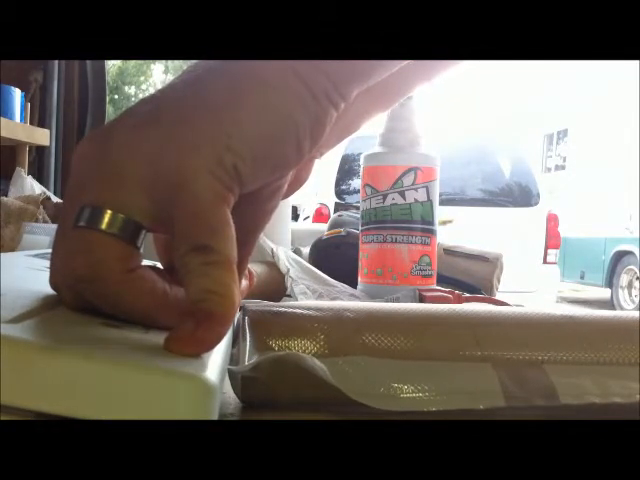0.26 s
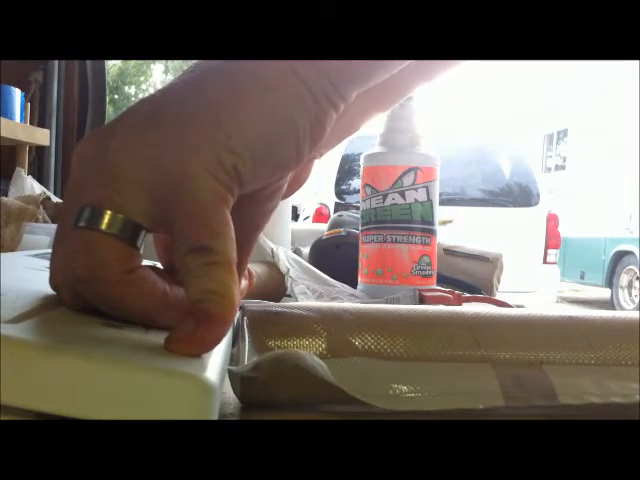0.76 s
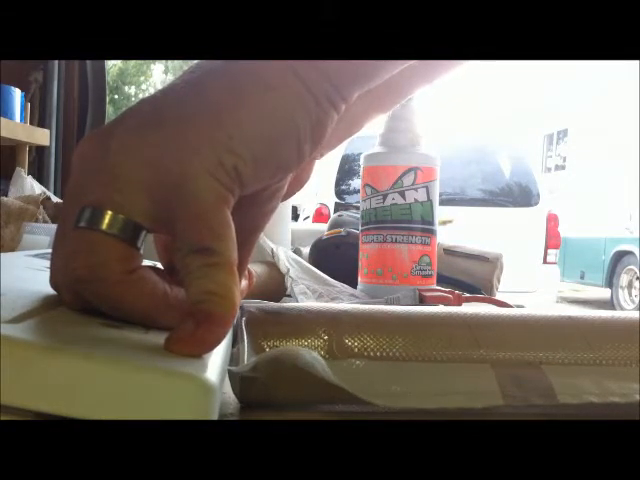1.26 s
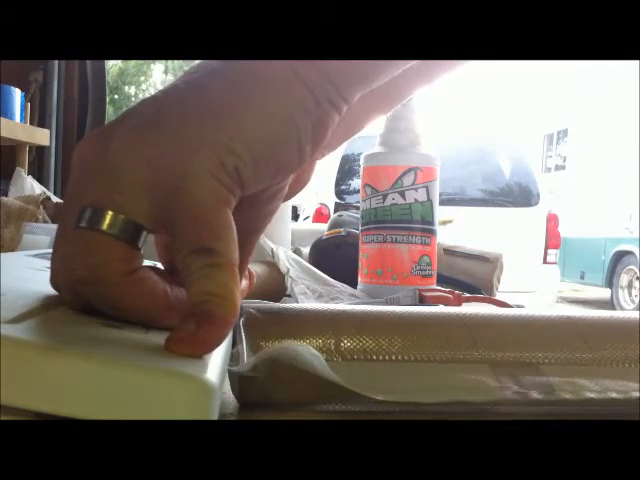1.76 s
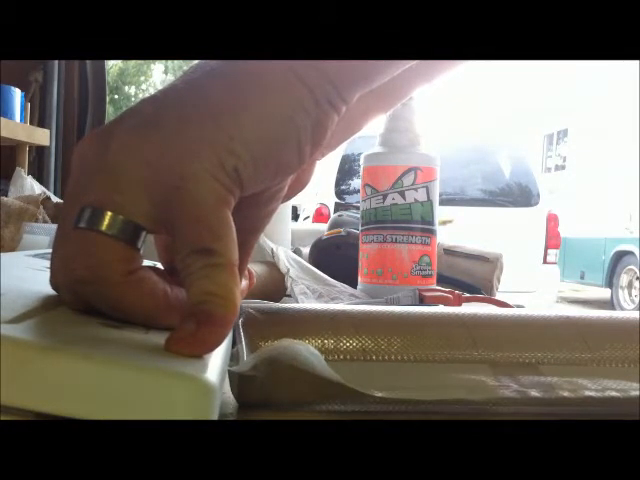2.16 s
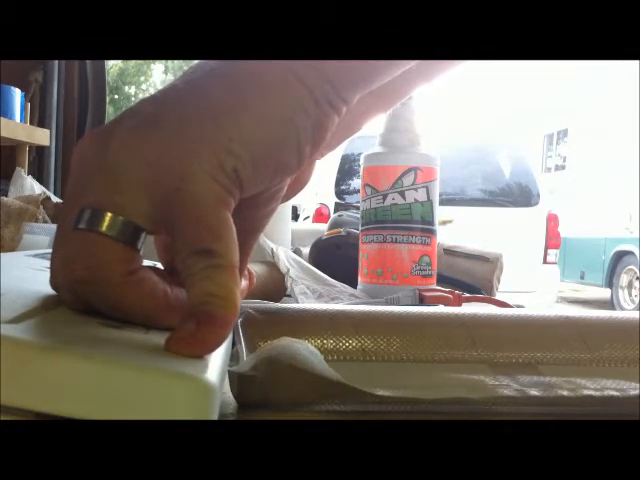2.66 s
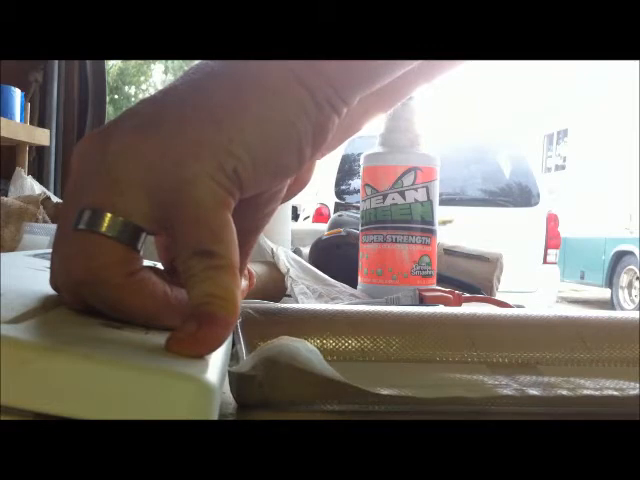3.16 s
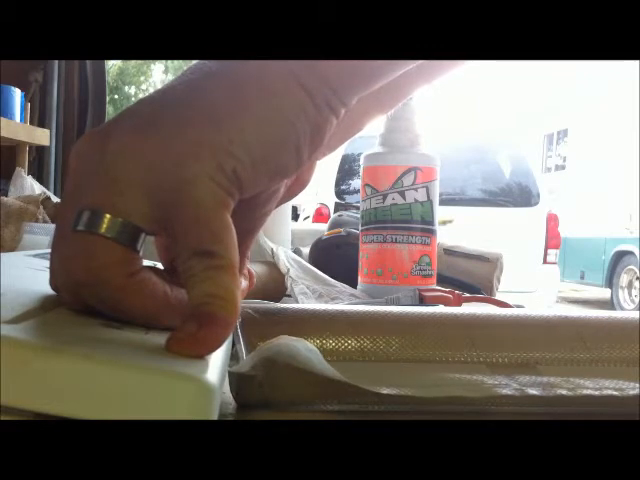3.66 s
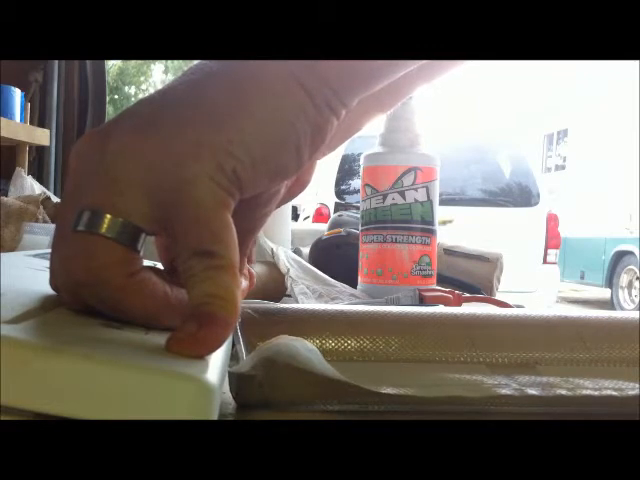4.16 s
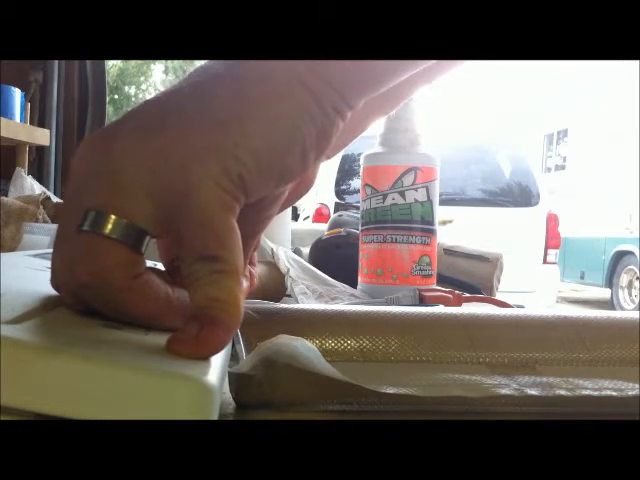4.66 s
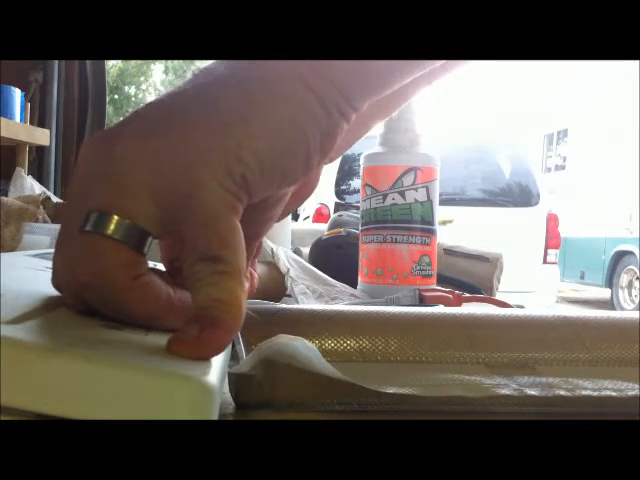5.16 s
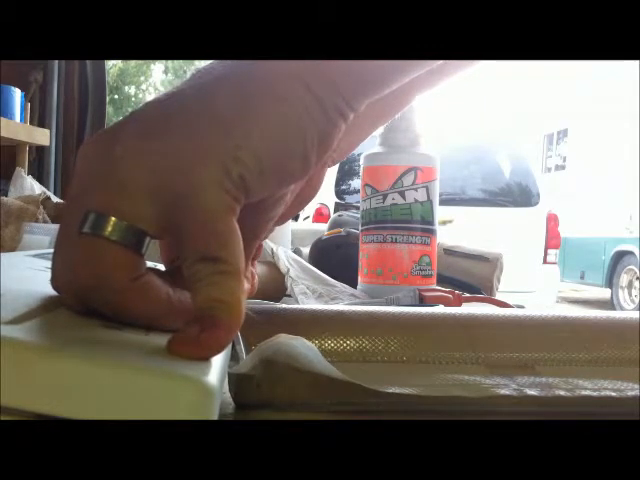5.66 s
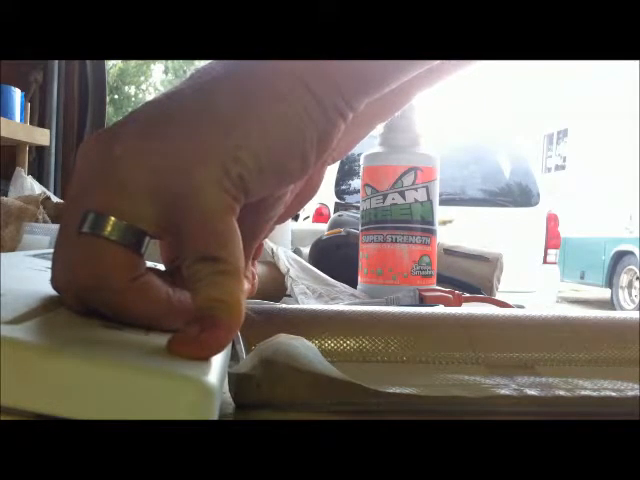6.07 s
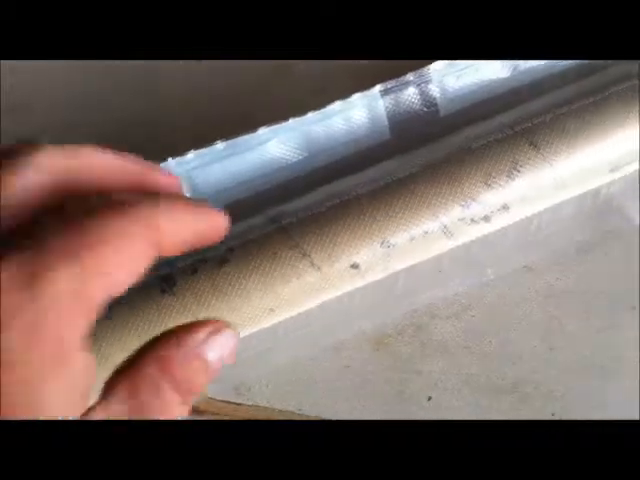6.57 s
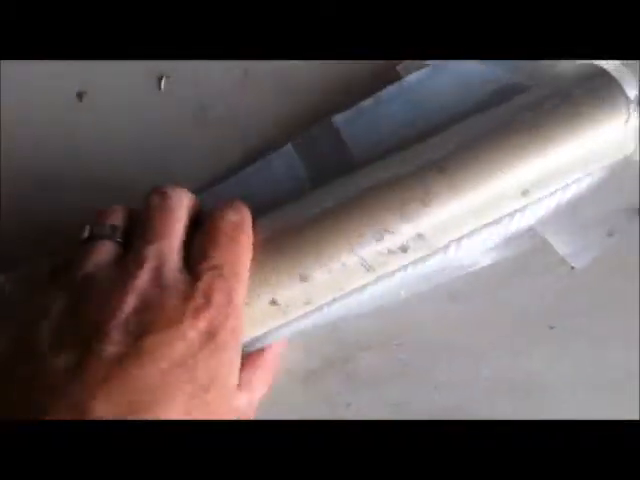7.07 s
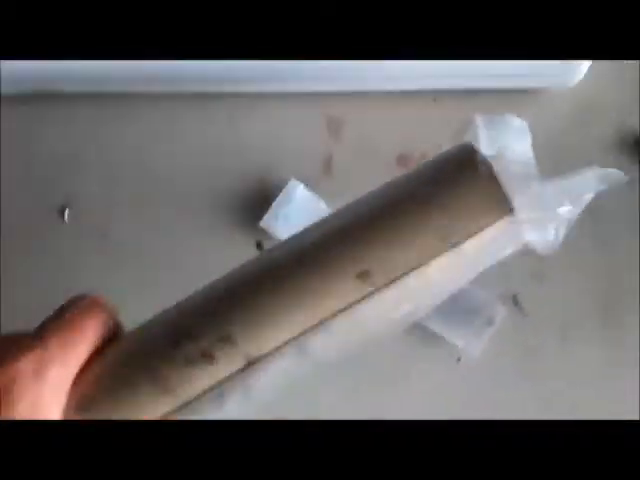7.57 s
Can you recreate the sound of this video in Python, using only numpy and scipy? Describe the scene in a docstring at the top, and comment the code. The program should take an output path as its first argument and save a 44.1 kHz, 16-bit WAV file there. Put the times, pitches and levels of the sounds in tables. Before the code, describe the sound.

From 0 to about 6.1 seconds a small vacuum sealer pump runs continuously, close and loud. It is a rough low drone pulsing about 67 times a second, too fast to count, with a strong nasal whine near 900 hertz, bright plastic rattle and rapid puffs of hissing air. It settles slightly in pitch at the start, dips briefly near 1.3, and from 4.8 the drone firms and pitch sags very slightly as the bag tightens. At 6.1 it stops abruptly with almost no echo. Quiet garage air with a faint low hum remains. From 6.8 a hand touches a film-wrapped tube: a small click, then a sharper hollow knock at 6.98, lighter taps around 7.1 to 7.25 and 7.44. Short soft scrapes accompany them, strongest near 7.2 and 7.45, then a thin plastic hiss and crinkle grows towards 7.7 as the tube slides away.

```python
"""Vacuum sealer in a garage

A small piston pump empties a bag close by: each turn gives a thump, a few knocks and puffs of air.
Striking excites harmonics of the turning speed, knocks ring the case modes, and air makes shaped noise.
The pump stops abruptly. In the quiet garage a hand takes a film-wrapped tube and slides it off the bench:
random tiny slips make the friction, and short clicks and scuffs ring the tube and the bench."""
import sys
import numpy as np
from scipy import signal
from scipy.fft import rfft, irfft, next_fast_len
from scipy.io import wavfile
from scipy.ndimage import uniform_filter1d

SR = 44100
rng = np.random.default_rng(int(sys.argv[2]) if len(sys.argv) > 2 else 0)


def unload_wav(signal):
    """Save mono or channel-first audio to the path in sys.argv[1] as 16-bit WAV at rate SR, clipped to [-1, 1]."""
    wavfile.write(
        sys.argv[1],
        SR,
        np.round(np.clip(np.atleast_2d(signal).T, -1, 1) * 32767).astype(np.int16),
    )


N = 345303
TIME = np.arange(N) / SR
SIZE = next_fast_len(N + SR // 2, real=True)  # padded transform length
FREQ = np.maximum(np.arange(SIZE // 2 + 1) * SR / SIZE, 1)  # Hz

FIRST_STROKE_S, STOP_S, QUIET_S = .0030, 6.115, 6.162
TIGHT_S, TIGHTEN_S = 4.8, .15  # the bag becomes tight
VACUUM_POWER = 2.5  # the vacuum builds from 0 to 1 as this power of the time
# levels with the bag still full: the thump, and the buzz, rattle and air together
THUMP_DB, CLATTER_DB = -19, -21.5
# change at full vacuum: the thump softens, the valve plate slaps harder
SOFTEN_DB, SLAP_DB = -1.1, 1.9


def pump(buzz_db=-7.5, buzz_turn=0.148, rattle_db=-4, room_db=-23, room_t60=0.84):
    """Periodic excitation: the motor's turn drives every part, and the garage adds a weak decaying echo."""
    hz = speed()
    vacuum = np.minimum(TIME / STOP_S, 1) ** VACUUM_POWER
    turns = np.cumsum(hz) / SR - FIRST_STROKE_S * hz[0]
    turn_ms = 1000 * (turns % 1) / hz  # time since the last stroke

    # the valve plate slaps a fraction of a turn after the stroke
    buzz = undb(buzz_db + SLAP_DB * vacuum) * plate_buzz(turns - buzz_turn)
    clatter = buzz + undb(rattle_db) * rattle(turns) + air(turn_ms)
    direct = undb(THUMP_DB + SOFTEN_DB * vacuum) * thump(turns, vacuum) + undb(CLATTER_DB) * clatter

    tail = noise() * 1000 ** (-TIME / room_t60) * (TIME > .004)
    echo = through(direct, rfft(tail, SIZE) / np.sqrt(np.sum(tail ** 2)))
    stop = np.interp(TIME, [STOP_S - .001, STOP_S, STOP_S + .035], [1, .035, 0])
    return (direct + undb(room_db) * echo) * stop


# the motor starts a little fast and settles to its running speed (turns per second)
RUN_HZ, START_EXTRA_HZ, SETTLE_S = 66.807, .24, .42
# it slows briefly once, and labours once the bag is tight
DIP_S, DIP_HZ, DIP_WIDTH_S = 1.33, .42, .085
SAG_HZ_PER_S = .144


def speed():
    """Motor under load: turns per second settle exponentially, dip once, and sag against the tight bag."""
    settle = START_EXTRA_HZ * np.exp(-TIME / SETTLE_S)
    dip = DIP_HZ * np.exp(-((TIME - DIP_S) / DIP_WIDTH_S) ** 2)
    return RUN_HZ + settle - dip - SAG_HZ_PER_S * np.maximum(TIME - TIGHT_S, 0)


# two partials change (multiples of the speed): the vacuum damps the whine, the tight bag lifts the drone
WHINE_ORDER, DAMP_DB = 14, -1
DRONE_ORDER, DRONE_DB = 7, 3.1
DARKEN_DB = -.4  # per octave at full vacuum
# Partials of the housing's thump. Each row: multiple of the turning speed, relative level in dB
# before the vacuum and the tight bag act.
THUMP_PARTIALS = [(2, -24.5), (3, -14.8), (4, -17), (5, -21), (6, -14.3), (7, -7.3), (8, -10), (9, -8.4),
                  (10, -2.7), (11, -12.8), (12, -3), (13, -12.5), (14, 1.2), (15, -18), (16, -23.5),
                  (17, -18.5), (18, -13.5), (19, -4.2), (20, -17.5), (21, -19)]


def thump(turns, vacuum):
    """Harmonic series: the housing, struck once a turn, sounds at multiples of the turning speed."""
    tight = np.clip((TIME - TIGHT_S) / TIGHTEN_S, 0, 1)
    changes = {WHINE_ORDER: DAMP_DB * vacuum, DRONE_ORDER: DRONE_DB * tight}
    return ring(turns, THUMP_PARTIALS, flutter_db=-0.05, tilt_db=DARKEN_DB * vacuum, changes=changes)


# Partials of the valve plate's buzz. Each row: multiple of the turning speed, relative level in dB.
PLATE_PARTIALS = [(22, -12), (23, -14.5), (24, -5), (25, -10.5), (26, -5.5), (27, -1.5), (28, -8),
                  (29, -19.5), (30, -5), (31, -5.5), (32, -9), (33, -1), (34, -0.5), (35, -6.5), (36, -7.5)]


def plate_buzz(turns):
    """Harmonic series: the slapped valve plate sounds at high multiples of the turning speed."""
    return ring(turns, PLATE_PARTIALS, flutter_db=0.06)


def ring(turns, tone, flutter_db, tilt_db=0, changes={}, bass_lag=5.3):
    """Minimum phase: a body struck once a turn answers after the blow, so levels fix its phases.

    tone lists (multiple, dB), tilt_db is per octave, and changes gives dB by multiple."""
    order, db = np.transpose(tone)
    # the cepstrum of the levels yields the phases
    skirt = np.interp(np.arange(129), [order[0] / 2, *order, order[-1] + 18], [-40, *db, -40])
    cepstrum = irfft(np.log(undb(skirt)))
    lag = rfft(2 * cepstrum[:len(cepstrum) // 2], len(cepstrum)).imag
    # slow bending waves bring the lowest partials late
    lag = lag + bass_lag * np.exp(-np.arange(len(lag)) / 5.2)

    wave = np.zeros(N)
    for k, level_db in zip(np.rint(order).astype(int), db):
        tilt = tilt_db * np.log2(k / order.mean())
        gain = undb(level_db + tilt + changes.get(k, 0))
        wave += gain * np.cos(2 * np.pi * k * turns + lag[k])
    return unit(wave) * undb(flutter_db * walk(60))


# Knocks of valves and crank in one turn. Each row: mean time after the stroke in ms, mean level in dB,
# random timing scatter in ms.
KNOCKS = [(0.951, 0, 0.014), (2.597, 4, 0.025), (3.35, -0.5, 0.019), (5.898, 4.5, 0.018),
          (6.45, -6.5, 0.06), (6.751, -2.5, 0.023)]


def rattle(turns, scatter_db=1.2, damping=0.42, drift_ms=.02):
    """Impact excitation: valves and crank knock at set points of each turn, with scatter and drifting play."""
    strokes = np.interp(np.arange(int(turns[-1])), turns, TIME)
    blows = np.zeros(N)
    for ms, db, scatter_ms in KNOCKS:
        late, strong = rng.standard_normal((len(strokes), 2)).T
        play_ms = drift_ms * np.interp(strokes, TIME, walk(14))
        times = strokes + (ms + play_ms + scatter_ms * late) / 1000
        blows += clicks(times, undb(db + scatter_db * strong))
    # plastic contacts are soft, and the small case radiates little bass
    contact = colour([(1100, -34), (1800, -5), (2600, 8), (6500, -3.5), (8000, -16), (15000, 3)])
    # knocked walls ring longer than the air that they enclose
    walls = case([(hz, width * damping, db) for hz, width, db, _ in CASE_MODES])
    return unit(through(blows, contact * walls))


# Resonances of the case. Each row: frequency in Hz, width in Hz when blown (narrower when knocked),
# relative level in dB when knocked, relative level in dB when blown.
CASE_MODES = [(1790, 650, -12.5, -22), (2207, 400, -6.5, -7), (2826, 670, -16, -6), (3569, 210, -0.5, -3.5),
              (3830, 35, -28, 3.5), (4146, 380, 4, 0.5), (4720, 170, -3, -6), (4883, 470, 2, -6),
              (5270, 650, 5, 6), (6020, 410, 0.5, 6.5), (7000, 250, -23, -6.5), (7030, 140, -13, 4)]


def case(modes, bounce_ms=0.704, bounce=0.086):
    """Modal response with comb filtering: an inverted reflection inside the case hollows its modes."""
    return resonances(modes) * (1 - bounce * np.exp(-2j * np.pi * FREQ * bounce_ms / 10 ** 3))


LEAK_DB = -21.5  # air that flows between the puffs
# Puffs of air in one turn. Each row: peak time after the stroke in ms, relative flow in dB,
# half width in ms to 1/e.
PUFFS = [(1.8, 9, 1.03), (5, 10.5, 1.73), (8.6, 5.5, 1.57), (13, -1.5, 1.38)]
# Resonances of the air outlet. Each row: frequency in Hz, width in Hz, relative level in dB.
OUTLET_MODES = [(9130, 440, -15), (8900, 460, -7), (10160, 124, -3), (10600, 500, -13), (11320, 380, -11.5),
                (12680, 440, -4.5), (13900, 250, -4.5), (14550, 150, -5), (14470, 170, -1.5),
                (15500, 620, -11)]
# Spectrum of the air's low turbulence. Each row: frequency in Hz, relative level in dB per Hz.
CHURN_SPECTRUM = [(20, -11), (70, -9), (250, -7), (440, -2), (535, 3), (600, -1), (800, 0), (1100, -6),
                  (1270, -2), (1450, -6), (1700, -5), (2600, -15), (6000, -30)]


def air(turn_ms, rush_db=-5.5, hiss_db=-15.0, churn_db=-14, gusty_db=1.37, spit_db=1.5):
    """Flow noise: the puffs modulate turbulence that rushes through the case and hisses at the outlet."""
    puffs = sum(undb(db) * np.exp(-((turn_ms - ms) / width) ** 2) for ms, db, width in PUFFS)
    flow = (undb(LEAK_DB) + puffs) * undb(gusty_db * walk(110))

    blown = case([(hz, width, db) for hz, width, _, db in CASE_MODES])
    body = blown * colour([(1100, 10), (1600, 7.5), (7200, -4.0), (8000, -21.0), (15000, -14)])
    rush = unit(through(noise() * flow, body))
    # the outlet jet grows faster than the flow that feeds it, and spits unevenly
    jet = flow ** 1.09 * undb(spit_db * walk(300))
    hiss = unit(through(noise() * jet, resonances(OUTLET_MODES)))
    # the low churn barely follows the puffs
    churn = unit(through(noise() * flow ** 0.097, colour(CHURN_SPECTRUM)))
    return undb(rush_db) * rush + undb(hiss_db) * hiss + undb(churn_db) * churn


# film hiss and crinkle relative to the scrape; the crinkle takes a share of the extra hiss
FILM_DB, CRINKLE_DB, CRINKLE_SHARE = -3.5, -5.5, .3
# the hand lands and rumbles on the tube from then on, most as it takes its grip
TOUCH_S, TOUCH_RISE_S, RUMBLE_DB = 6.78, .03, -59
GRIP_S, GRIP_DB, GRIP_RISE_S, GRIP_FALL_S = 6.99, -58, 0.023, 0.053


def slide():
    """Sliding friction: the tube drags over the bench while its plastic film hisses and crinkles."""
    rumble = friction([(70, -45), (150, -15), (280, 2), (440, 3), (700, -7), (1500, -25)],
                      grain_db=2.0, slips_per_s=4000)
    scrape = friction([(500, -20), (1200, 0), (1700, 0.5), (2800, -5), (4500, -21)],
                      grain_db=0.5, slips_per_s=2000)
    film = friction([(1800, -26), (3300, 0.0), (3800, -3), (4500, -0.5), (5900, -5), (7000, -12), (8500, -19)],
                    grain_db=0.3, slips_per_s=25000)
    crinkle = friction([(4500, -22), (7500, -2), (11000, 0), (14000, 3), (16000, -3)],
                       grain_db=2.0, slips_per_s=12000)

    hand = undb(RUMBLE_DB) + undb(GRIP_DB) * swell(GRIP_S, GRIP_RISE_S, GRIP_FALL_S)
    hissing = undb(FILM_DB) * pushing(0.98) * film
    crinkling = undb(CRINKLE_DB) * pushing(CRINKLE_SHARE) * crinkle
    touch = np.clip((TIME - TOUCH_S) / TOUCH_RISE_S, 0, 1)
    handling = touch * (hand * rumble + pushing(0) * scrape + hissing + crinkling)
    # the light tube radiates no deep bass
    return through(handling, colour([(70, -20), (150, 0)]))


# Pushes that slide the tube. Each row: peak time in seconds, scrape level in dB, rise in seconds,
# fall in seconds, extra film hiss in dB (of which each sound takes a share).
PUSHES = [(6.975, -54, .04, .03, -5), (7.105, -54, 0.038, .025, -3), (7.215, -48, 0.034, .045, 1),
          (7.447, -48, 0.097, 0.061, 0.5), (7.72, -57.5, 0.41, .2, 10)]


def pushing(film_share):
    """Energy summation: the pushes add as powers, each with a share of its extra film hiss."""
    power = 0
    for peak_s, db, rise_s, fall_s, film_db in PUSHES:
        power = power + (undb(db + film_share * film_db) * swell(peak_s, rise_s, fall_s)) ** 2
    return np.sqrt(power)


def swell(peak_s, rise_s, fall_s):
    """Exponential growth and decay: an envelope that reaches one at its peak."""
    return np.exp(-np.maximum((peak_s - TIME) / rise_s, (TIME - peak_s) / fall_s))


def friction(spectrum, grain_db, slips_per_s):
    """Stick-slip as shot noise: tiny slips of uneven size, coloured by the surface that they shake."""
    slips = (rng.random(N) < slips_per_s / SR) * noise() * undb(grain_db * walk(250))
    return unit(through(slips, colour(spectrum)))


# Fingers and tube tapping the bench. Each row: start in seconds, strength in dB,
# dull thud of the bench in dB relative to that strength.
TAPS = [(6.864, -40, -3), (6.946, -48, -8), (6.982, -27, -5.5), (6.9857, -35, -2), (6.988, -38, -4),
        (6.998, -36, -8), (7.110, -36, -14), (7.144, -33, -14), (7.2185, -42, -10), (7.253, -42, 3),
        (7.260, -36, 1), (7.441, -37, -12)]
# Resonances of the tube. Each row: frequency in Hz, width in Hz, relative level in dB.
TUBE_MODES = [(1210, 110, 8), (1430, 93, 15), (1800, 170, 11), (2040, 200, 6), (3150, 520, -4),
              (4500, 470, -13), (6300, 980, -16), (13000, 5000, -9)]


def taps(click_db=11.5, contact_db=-6, contact_s=0.0008, ring_s=0.02, ring_db=-18):
    """Modal excitation: a sharp click and a short scuff ring the tube and thud in the bench."""
    tube = resonances(TUBE_MODES)
    bench = resonances([(185, 50, 12), (370, 120, 10), (720, 250, 0)]) * colour([(60, -28), (140, 6.5)])
    age = TIME[:SR // 8]
    decay = undb(contact_db) * np.exp(-age / contact_s) + undb(ring_db) * np.exp(-age / ring_s)
    on_tube, on_bench = np.zeros(N), np.zeros(N)
    for start_s, db, thud_db in TAPS:
        scuff = rng.standard_normal(len(age)) * decay
        push = undb(click_db) * (age == 0) + scuff
        first = int(start_s * SR)
        span = slice(first, first + len(age))
        on_tube[span] += undb(db) * push
        on_bench[span] += undb(db + thud_db) * push
    return through(on_tube, tube) + through(on_bench, bench)


GARAGE_DB = -55.5  # mean level of the room air
# Spectrum of the garage air. Each row: frequency in Hz, relative level in dB per Hz.
GARAGE_SPECTRUM = [(15, -61), (25, -37), (69, -37), (82, -15), (113, -15), (129, -5), (144, -6), (169, -7),
                   (433, -11.5), (762, -14.5), (848, -12.5), (1140, -15), (4040, -20), (15500, -33)]
# Faint far hums. Each row: start in seconds, end in seconds, mean frequency in Hz, mean level in dB.
HUMS = [(6.104, 7.002, 145.6, -68), (6.967, 7.56, 195, -58.5), (7.54, 7.9, 193, -62), (7.58, 7.9, 302, -61)]


def garage(hum_waver_db=1.0, hum_drift=0.55):
    """Background noise: coloured room air and faint hums, wavering in level and phase, once it is quiet."""
    out = unit(through(noise(), colour(GARAGE_SPECTRUM))) * undb(GARAGE_DB + 0.43 * walk(9.3))
    for start, end, hz, db in HUMS:
        fade = np.clip(np.minimum(TIME - start, end - TIME) / 0.027, 0, 1)
        tone = unit(np.sin(2 * np.pi * hz * TIME + hum_drift * walk(12)))
        out = out + fade * undb(db + hum_waver_db * walk(14)) * tone
    return out * (TIME > QUIET_S)


def undb(db):
    """Logarithmic level: decibels to amplitude gain."""
    return 10 ** (np.asarray(db) / 20)


def unit(x):
    """Effective value: scale to an rms of one."""
    return x / np.sqrt(np.mean(x ** 2))


def noise():
    """White noise: independent Gaussian samples."""
    return rng.standard_normal(N)


def through(x, response):
    """Linear filtering: multiply the spectrum by a frequency response."""
    return irfft(rfft(x, SIZE) * response, SIZE)[:N]


def colour(points):
    """Spectral envelope: join (Hz, dB) points along a logarithmic frequency axis."""
    hz, db = np.transpose(points)
    return undb(np.interp(np.log(FREQ), np.log(hz), db))


def resonances(modes):
    """Modal superposition: damped (Hz, width in Hz, dB) resonators side by side."""
    return sum(undb(db) / (1 + 1j * (FREQ ** 2 - hz ** 2) / (FREQ * width)) for hz, width, db in modes)


def walk(rate):
    """Low-passed noise: a smooth random drift with an rms of one, from rate values per second."""
    k = max(int(SR / rate), 1)
    steps = np.repeat(rng.standard_normal(N // k + 1), k)
    return unit(uniform_filter1d(uniform_filter1d(steps, k), k)[:N])


def clicks(times, sizes):
    """Band-limited impulses: short windowed sincs at times between the samples."""
    out = np.zeros(N)
    at = times[:, None] * SR
    index = np.floor(at).astype(int) + np.arange(-7, 9)
    shape = np.sinc(index - at) * np.sinc((index - at) / 8)
    inside = (index >= 0) * (index < N)
    np.add.at(out, np.clip(index, 0, N - 1), sizes[:, None] * shape * inside)
    return out


def scene():
    """Superposition: the pump, then the handling in the quiet garage."""
    return (pump() + garage() + slide() + taps())[None]


TOP_HZ = 15800


def record(dry):
    """Band limitation: a small microphone with a steep elliptic top cut."""
    return signal.sosfilt(signal.ellip(10, .1, 80, TOP_HZ, fs=SR, output="sos"), dry)


dry = scene()
out = record(dry)
unload_wav(out)
```